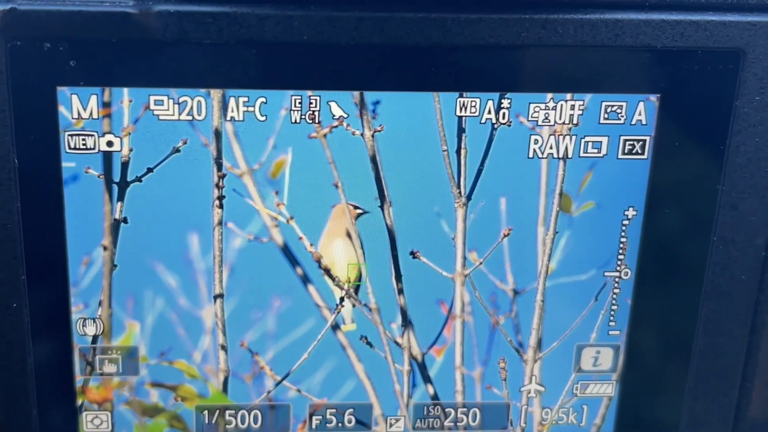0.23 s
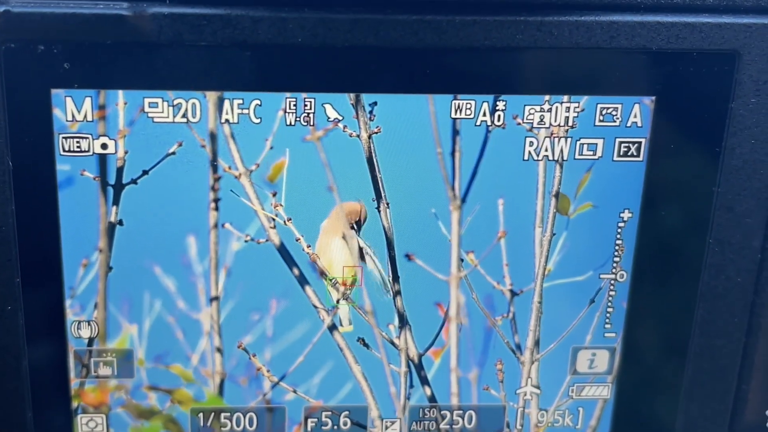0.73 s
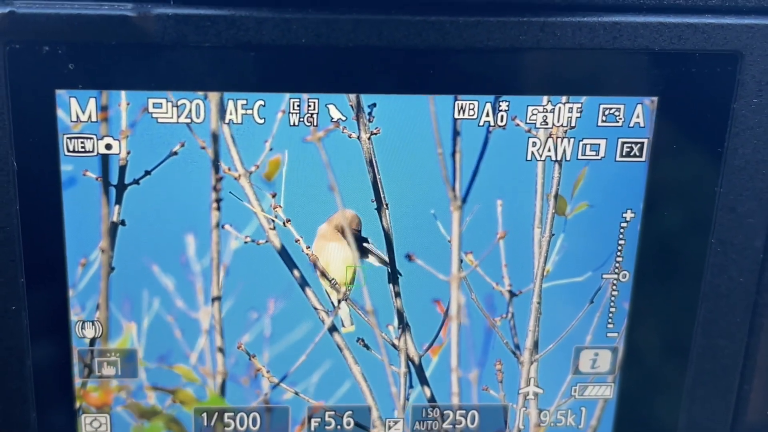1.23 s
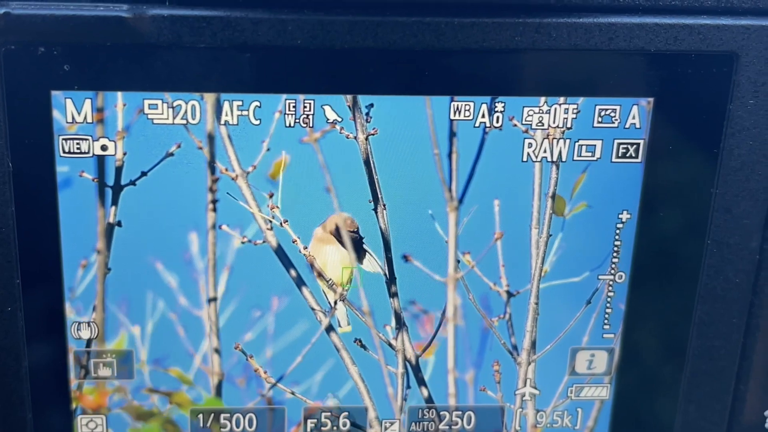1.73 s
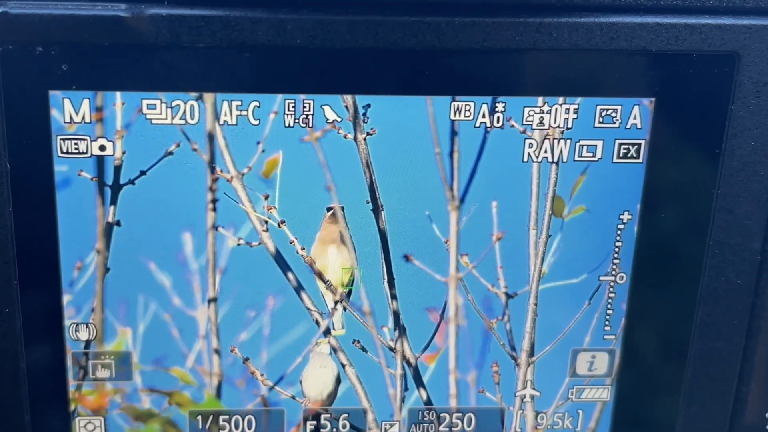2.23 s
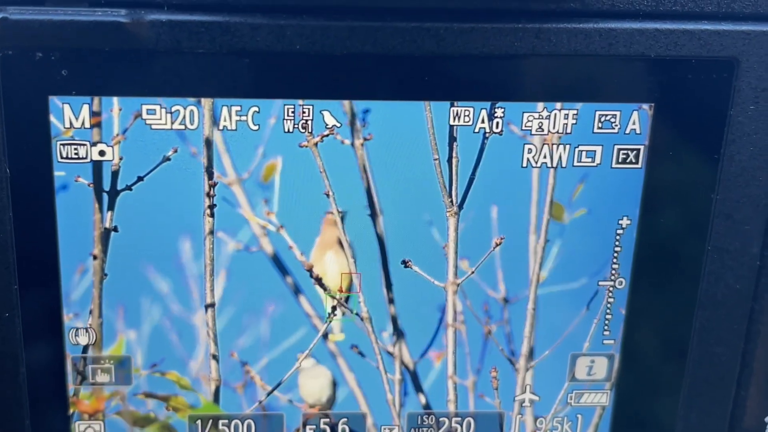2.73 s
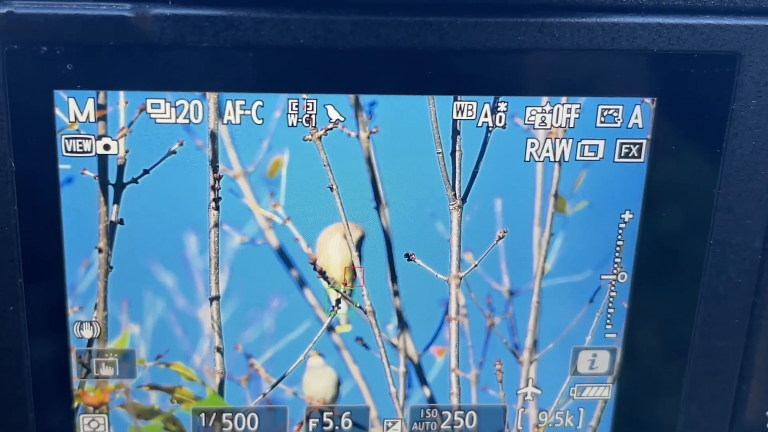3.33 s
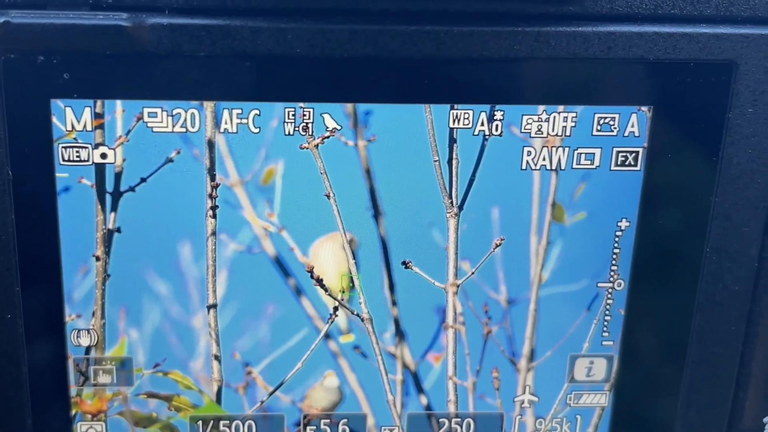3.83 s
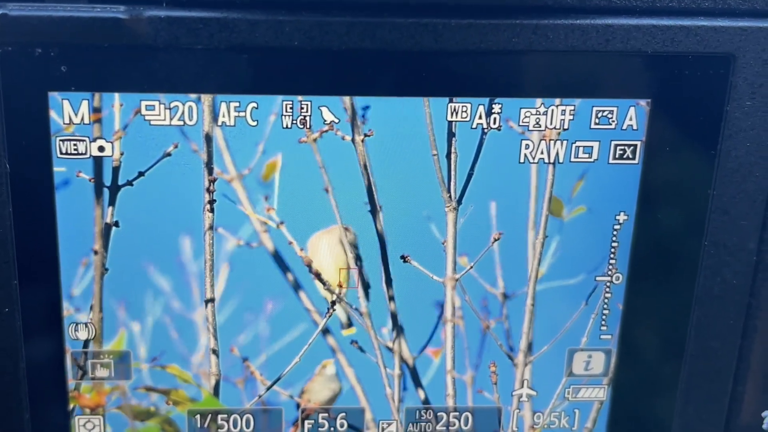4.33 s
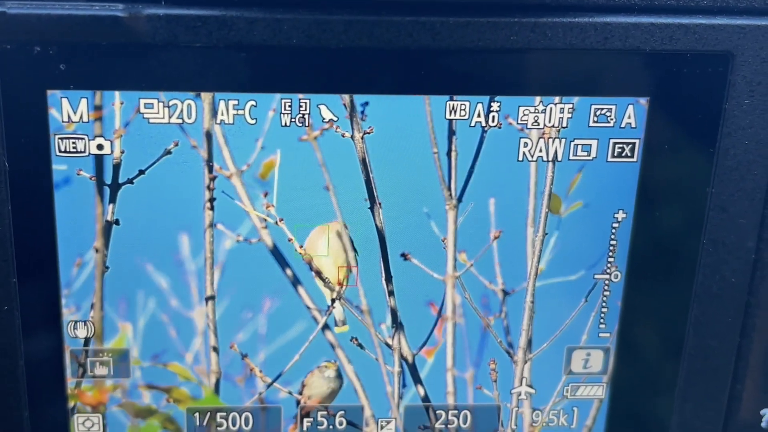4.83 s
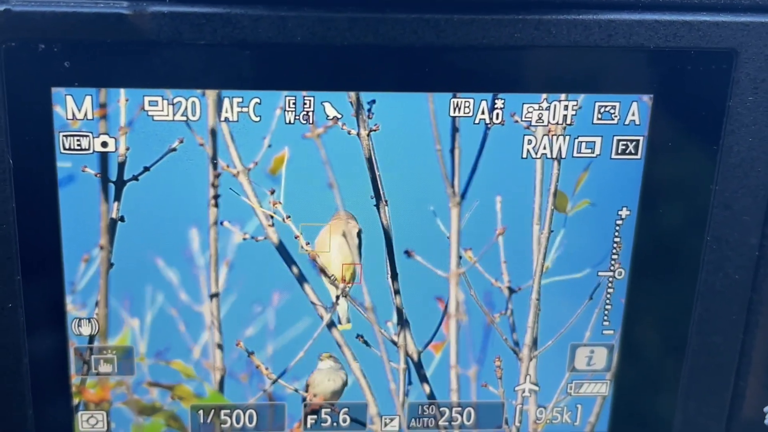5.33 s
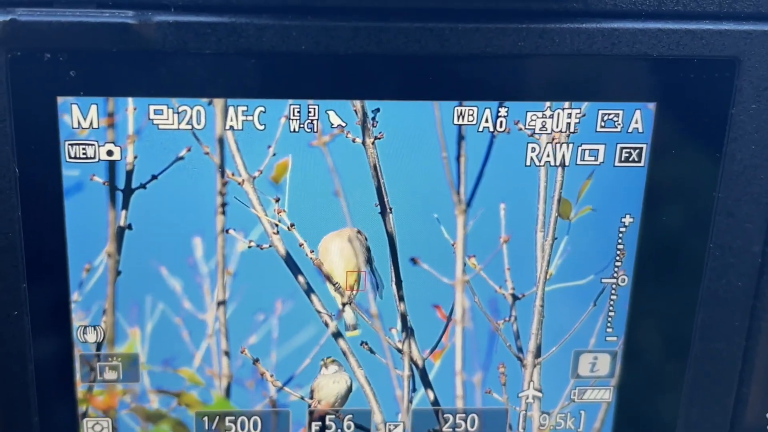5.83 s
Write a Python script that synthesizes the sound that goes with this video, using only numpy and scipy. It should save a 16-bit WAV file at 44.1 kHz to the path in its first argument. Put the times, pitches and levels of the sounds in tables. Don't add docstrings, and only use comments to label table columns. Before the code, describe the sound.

Thin, very high bird whistles come in brief scattered calls over a steady low rumble of distant traffic, with faint rustles and one dull tap.

```python
import sys
import numpy as np
from scipy import signal
from scipy.fft import rfft, irfft, next_fast_len
from scipy.io import wavfile
from scipy.ndimage import uniform_filter1d, minimum_filter1d, map_coordinates

SR = 44100
rng = np.random.default_rng(int(sys.argv[2]) if len(sys.argv) > 2 else 0)


def attenuation_scalar(level_db):
    decades = np.asarray(level_db, float) / 20
    return 10 ** decades


def digitize_waveform(pressure):
    field = np.atleast_2d(pressure).T
    bounded = np.clip(field, -1, 1)
    quanta = np.round(bounded * 32767).astype(np.int16)
    wavfile.write(sys.argv[1], SR, quanta)


N = 268216

# start_s, level_db
ROAD_BUSY = [
    (0.0, -44.5),
    (0.46, -47.5),
    (1.78, -41.5),
    (1.98, -45),
    (2.0, -42.5),
    (2.59, -45.5),
    (3.64, -42.5),
    (5.67, -45),
    (5.86, -42),
    (6.08, -42.5),
]
# start_s, level_db
HEAVY_ENGINES = [
    (0, 3),
    (1.1, 2),
    (1.4, -1),
    (1.65, -1),
    (1.901, -2),
    (2.8, 0),
    (4.9, -1),
    (6.08, -0.5),
]
# freq_hz, level_db (per Hz)
BOOM = [(15, -52), (35, 14.5), (50, 11.5), (65, 21), (90, 14), (120, 8.5), (200, -67)]
ROAR = [(80, -38.5), (130, -3), (170, 0.5), (220, 1.5), (280, -3), (350, -9), (440, 0), (490, -4.5),
        (570, -14), (640, -9.5), (800, -13.5), (980, -14), (1100, -21), (1600, -80.5)]
AIR = [(700, -20), (1100, -2), (1300, -4), (1800, -8.5), (2400, -17), (3000, -21.5), (3700, -33.5),
       (5300, -38), (6000, -36), (8000, -38), (10000, -35.5), (11200, -39), (11750, -45), (12700, -51)]
# pitch_hz, level_db (rms)
ENGINES = [(52, -51.5), (66, -48.5), (220, -69)]
# middle_s, length_s, level_db, pan_db (left over right)
RASPS = [(0.356, .03, -81, -6), (0.438, 0.056, -71, -1), (1.882, .045, -78, 0), (1.931, .02, -72, 2),
         (1.97, 0.043, -70.5, 0), (2.002, .04, -83, 2), (2.92, .06, -76.5, 0), (3.42, 0.12, -79, 0),
         (3.945, 0.098, -71.5, 0), (4.887, .07, -79.5, 2)]
# start_s, length_s, held_hz, end_hz, level_db
LOWER = [(1.324, .064, 7420, 7600, -51), (1.388, .029, 7450, 8250, -50), (1.417, .032, 7650, 8700, -52),
         (1.45, .027, 7800, 8550, -55), (2.081, .042, 7520, 7480, -58), (2.123, .075, 7250, 7300, -69),
         (2.2, .018, 7350, 7400, -75), (2.236, .03, 7950, 7550, -72), (3.618, .07, 7400, 7850, -61),
         (3.688, .036, 7450, 7750, -60), (3.732, .035, 7900, 8050, -71), (4.53, .03, 7500, 7380, -68),
         (4.56, .035, 7200, 7000, -69), (4.595, .036, 6880, 6850, -69), (4.65, .024, 8050, 7800, -79),
         (5.69, .016, 7480, 7300, -76), (5.706, .05, 7050, 7750, -81), (5.756, .034, 7400, 7550, -77),
         (5.964, .042, 7500, 7250, -78)]
# start_s, length_s, held_hz, end_hz, level_db
UPPER = [(1.334, 0.047, 8220, 8370, -59), (1.388, 0.023, 8250, 8740, -59), (1.424, 0.028, 8670, 8900, -61),
         (1.455, 0.02, 8850, 8760, -59.5), (2.09, .03, 8100, 8040, -77), (2.144, 0.018, 7950, 7800, -64),
         (3.63, 0.067, 8500, 8000, -75), (3.71, .055, 8500, 8730, -71), (4.56, .07, 7550, 7500, -89)]
# start_s, length_s, top_hz, rise_hz (up to the top),
# level_db
CHIRPS = [(2.378, .038, 4100, 1600, -78), (2.414, .012, 4550, 400, -82), (2.594, .008, 4650, 100, -86),
          (2.604, .032, 5600, 700, -84), (2.714, .012, 4750, 1250, -78), (3.146, .026, 6500, 500, -91),
          (3.393, .042, 4200, 1300, -77), (4.914, .02, 4230, 300, -72), (4.934, .012, 4150, 250, -72),
          (5.1, .02, 4350, 150, -93), (5.137, .025, 4300, 150, -92)]
# start_s, pan_db, echo_db, echo_t60_s, hoarseness (0-1)
PERCHES = [
    (0, 3, -9, .27, .11),
    (2, -6, -4, .11, .33),
    (2.3, 0, -4, .15, .3),
    (2.55, -8, -10, .15, .12),
    (3.2, 0, -10, .12, .15),
    (3.55, -7, -7, .2, .15),
    (4.4, -3, -4, .16, .22),
    (4.8, 3, -13, .25, .2),
    (5.5, -4, -9, .1, .12),
]
# freq_hz, pan_db
SHADE = [(7700, 1), (8300, 3)]
# middle_s, length_s, centre_hz, level_db, pan_db
RUSTLES = [(1.69, .008, 4750, -74, 12), (1.688, .006, 6150, -64, 1), (1.72, .045, 6250, -71, 0),
           (1.785, .05, 6500, -80, -1), (1.79, .045, 4350, -72, -1), (2.44, .05, 3800, -80, 0),
           (2.735, .04, 4300, -84, 3), (3.082, .016, 4400, -84, 2), (3.19, .05, 6400, -88, 0),
           (3.335, .025, 3800, -78, -3), (3.458, .03, 4100, -83, 0), (4.305, .014, 3250, -68, -7),
           (4.54, .015, 3900, -81, 0), (4.905, .02, 5200, -84, 0), (4.98, .05, 4100, -84, 3),
           (5.423, .005, 6200, -80, -3), (5.437, .03, 8200, -81, -10)]
# start_s, peak_db, brightness_db (per octave), pan_db
TICKS = [
    (1.685, -55, -4, 0),
    (2.719, -67, 6, -8),
    (3.0096, -46.5, -7, 2),
    (3.064, -75, 9, 2),
    (3.1244, -68, 5, 3),
    (4.7934, -75, 8, 5),
    (5.4214, -74, 8, -5),
]
# pitch_hz, width_hz, level_db
SHELL = [(2260, 260, 3), (4150, 350, -6), (4750, 400, -5), (6150, 590, -19), (7900, 700, -26)]
# freq_hz, likeness (0-1)
ALIKE = [(60, 0.98), (220, 0.83), (480, 0.78), (700, 0.071), (1300, 0.74), (1700, 0.28), (2600, 0.43),
         (3700, 0.023), (5500, 0.05), (7500, 0.11), (8400, 0.96), (13000, 1)]
# freq_hz, pan_db
TILT = [(60, -2.5), (400, -1), (900, -6), (1400, 1), (2700, -0.5), (3300, -2), (3900, -2.5), (5300, -2.5),
        (6600, -4.5), (8300, -0.5)]
# freq_hz, left_lead_rad
LEAD = [(50, 0), (500, 1.1), (850, 3.1), (1200, 3.1), (1700, 2), (2200, 0), (2800, -1.8), (3200, -.9),
        (6400, -.5), (7600, -2.4), (8600, 0), (10300, 3.14), (11900, 6.28), (13000, 6.6)]

SWOOP_HZ, SWOOP_HZ_PER_DB, QUIET_DB, UPPER_SWOOP = 600, 36, -78, .42
JOIN_S = .014
CHIRP_SAG = .28
HAZE_DB, HAZE_DB_PER_HOARSE = -17, 26


def unit(x):
    return x / np.sqrt(np.mean(x ** 2) + 1e-20)


def along(points, hz):
    f, value = np.transpose(points)
    return np.interp(np.log(hz + 1), np.log(f + 1), value)


def over_time(points):
    return np.interp(np.arange(N) / SR, *np.transpose(points))


def wobble(rate):
    knots = rng.standard_normal(int(N * rate / SR) + 4)
    return map_coordinates(knots, [np.arange(N) * rate / SR])


def filtered(x, response):
    m = next_fast_len(x.shape[-1] + 8192)
    return irfft(rfft(x, m) * response(np.fft.rfftfreq(m, 1 / SR)), m)[..., :x.shape[-1]]


def sides(pan_db):
    return attenuation_scalar(np.array([pan_db, -pan_db]) / 2)


def pair(size):
    def mid_side(hz):
        turn = np.arccos(np.clip(along(ALIKE, hz), 0, 1)) / 2
        return np.array([np.cos(turn), np.sin(turn)])
    mid, side = filtered(rng.standard_normal((2, size)), mid_side)
    return np.array([mid + side, mid - side])


def patches(depth_db):
    z = signal.stft(pair(size=N), nperseg=512)[2]
    field = uniform_filter1d(rng.standard_normal(z.shape[1:]), size=8, axis=0)
    field = uniform_filter1d(field, size=12, axis=1)
    return signal.istft(z * attenuation_scalar(depth_db * unit(field)), nperseg=512)[1][:, :N]


def rush(spectrum, depth_db):
    def colour(hz):
        return attenuation_scalar(along(spectrum, hz)) * sides(along(TILT, hz)) * (hz < 13000)
    return unit(filtered(patches(depth_db), colour))


def traffic():
    tones = np.zeros(N)
    for hz, db in ENGINES:
        level = attenuation_scalar(db + 1.7 * wobble(5.6))
        tones += level * np.sin(2 * np.pi * np.cumsum(hz + 2.205 * wobble(3)) / SR)
    engines = np.sqrt(2) * tones * sides(-2.3)[:, None]
    boom = attenuation_scalar(over_time(HEAVY_ENGINES)) * (attenuation_scalar(-46.0) * rush(BOOM, depth_db=1.0) + engines)
    roar = attenuation_scalar(over_time(ROAD_BUSY) + 1.0 + 0.31 * wobble(5.26)) * rush(ROAR, depth_db=0.85)
    air = attenuation_scalar(-60.5 + .4 * wobble(3)) * rush(AIR, depth_db=.8)
    return boom + roar + air


def scrape(out, s, length, hz, width_hz, db, pan_db):
    u = np.linspace(-2, 2, round(2 * length * SR))
    grains = np.repeat(rng.standard_normal(len(u) // 128 + 1), 128)[:len(u)]
    rough = pair(size=len(u)) * attenuation_scalar(3 * grains)
    band = filtered(rough, lambda f: np.exp(-((f - hz) / width_hz) ** 2 * 2))
    swell = attenuation_scalar(db) * unit(band) * np.exp(-u ** 2)
    out[:, round((s - length) * SR):][:, :len(u)] += swell * sides(pan_db)[:, None]


def insect():
    out = np.zeros((2, N))
    for s, length, db, pan_db in RASPS:
        scrape(out, s, length, 9670, 1700, db, pan_db)
    return out


def slurred(notes, swoop=1):
    out, last_s, last_hz = [], -1, 0
    for s, length, held_hz, end_hz, db in notes:
        fresh_hz = held_hz + swoop * (SWOOP_HZ + SWOOP_HZ_PER_DB * (db - QUIET_DB))
        start_hz = last_hz if s - last_s < JOIN_S else fresh_hz
        out.append((s, length, start_hz, held_hz, end_hz, db))
        last_s, last_hz = s + length, end_hz
    return out


def voice(glides, bend, flutter_db, waver, lift_hz=0, fade_db=11):
    hz, gain = np.zeros(N), np.zeros(N)
    for s, length, start_hz, middle_hz, end_hz, db in glides:
        u = np.linspace(0, 1, round(length * SR))
        span = slice(round(s * SR), round(s * SR) + len(u))
        hz[span] = middle_hz + (start_hz - middle_hz) * (1 - u) ** bend + (end_hz - middle_hz) * u ** bend
        gain[span] = attenuation_scalar(db - fade_db * np.abs(hz[span] - middle_hz) / 1000)
    sounding = np.flatnonzero(hz)
    pitch = np.interp(np.arange(N), sounding, hz[sounding]) + lift_hz
    pitch = pitch * (1 + waver * wobble(700))
    joined = -minimum_filter1d(-gain, size=200)
    soft = uniform_filter1d(joined, size=260)
    return np.sqrt(2) * soft * attenuation_scalar(flutter_db * wobble(130)) * np.sin(2 * np.pi * np.cumsum(pitch) / SR)


def bird_song(hoarse):
    lower, upper = slurred(LOWER), slurred(UPPER, UPPER_SWOOP)
    song = voice(lower, 4.8, 1.5 + 6 * hoarse, .04 * hoarse)
    song += voice(upper, 4.5, 2.5 + 6 * hoarse, .05 * hoarse)
    arches = []
    for s, length, top_hz, rise_hz, db in CHIRPS:
        arches.append((s, length, top_hz - rise_hz, top_hz, top_hz - CHIRP_SAG * rise_hz, db))
    song += voice(arches, 4.5, 2.5, .05 * hoarse, fade_db=5)
    song += attenuation_scalar(-12) * voice(upper, 3, 3, .04, lift_hz=750)
    song += attenuation_scalar(-26) * voice(upper, 3, 3, .05, lift_hz=1700)
    song += attenuation_scalar(HAZE_DB + HAZE_DB_PER_HOARSE * hoarse) * voice(lower, 4.8, 4, .045, lift_hz=550)
    return song


def birds():
    edges = [0] + [round(s * SR) for s, *_ in PERCHES[1:]] + [N]
    song = bird_song(np.repeat([rough for *_, rough in PERCHES], np.diff(edges)))
    out = np.zeros((2, N))
    t = np.arange(SR // 2) / SR
    for (s, pan_db, echo_db, t60, _), a, b in zip(PERCHES, edges, edges[1:]):
        tail = pair(size=len(t)) * attenuation_scalar(-60 * t / t60) * (t > .003)
        tail /= np.linalg.norm(tail[0])
        wet = signal.fftconvolve(song[None, a:b], tail, axes=1)[:, :N - a]
        out[:, a:a + wet.shape[1]] += attenuation_scalar(echo_db) * wet * sides(0.14 * pan_db)[:, None]
        out[:, a:b] += song[a:b] * sides(pan_db)[:, None]

    def ports(hz):
        early = np.exp(-1j * np.pi * np.outer([1, -1], hz) * 9e-6)
        return sides(along(SHADE, hz)) * early
    return filtered(out, ports)


def rustles():
    out = np.zeros((2, N))
    for s, length, hz, db, pan_db in RUSTLES:
        scrape(out, s, length, hz, 620, db, pan_db)
    return out


def ticks():
    out, t = np.zeros((2, N)), np.arange(SR // 20) / SR
    rise = (1 - np.exp(-t / .0005)) ** 2
    for s, db, bright_db, pan_db in TICKS:
        ring = np.zeros(len(t))
        for hz, width_hz, level_db in SHELL:
            mode = attenuation_scalar(level_db + bright_db * np.log2(hz / 2250) + rng.normal(0, 1.4))
            ring += mode * np.exp(-np.pi * width_hz * t) * np.sin(2 * np.pi * hz * t)
        out[:, round(s * SR):][:, :len(t)] += attenuation_scalar(db + 9.5) * ring * rise * sides(pan_db)[:, None]
    return out


def scene():
    return traffic() + insect() + birds() + rustles() + ticks()


def low_pass(x):
    return signal.sosfilt(signal.butter(12, 12800, fs=SR, output="sos"), x)


def record(dry):
    f, radians = np.transpose(LEAD)
    turned = filtered(dry, lambda hz: np.exp(.5j * np.outer([1, -1], np.interp(hz, f, radians))))
    return low_pass(turned)


dry = scene()
out = record(dry)
digitize_waveform(out)
```